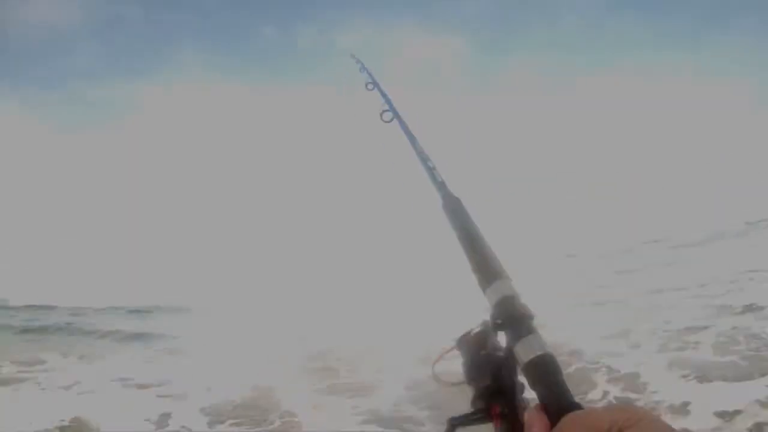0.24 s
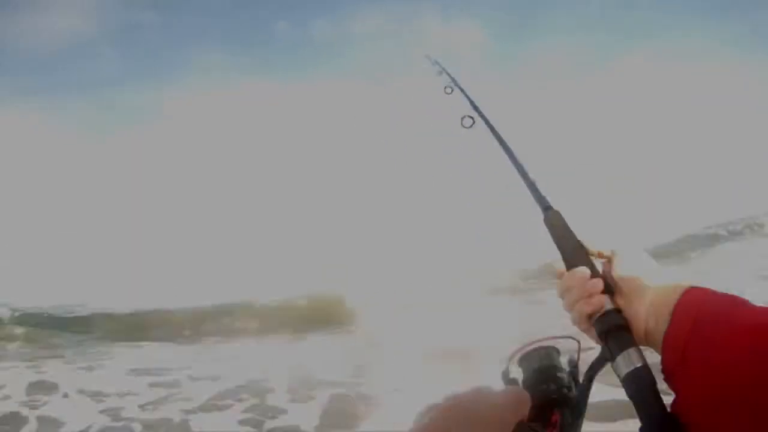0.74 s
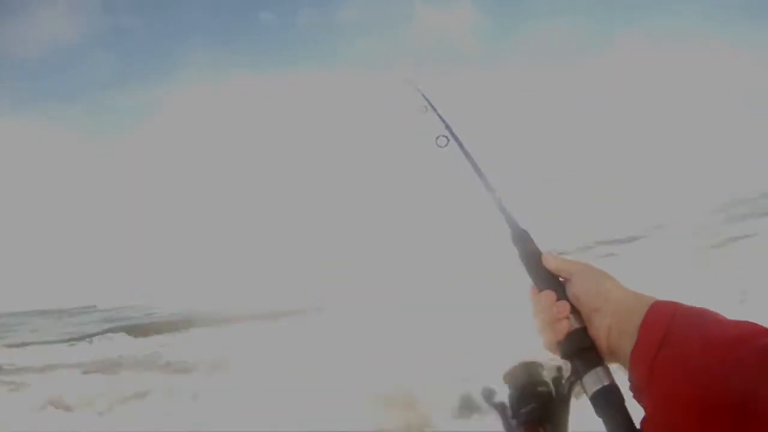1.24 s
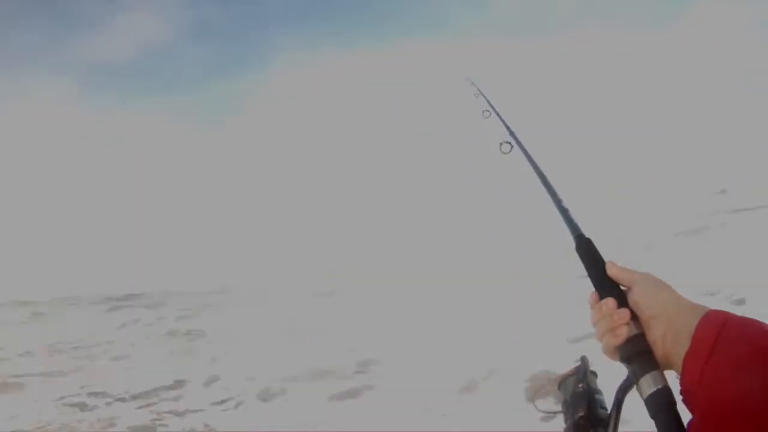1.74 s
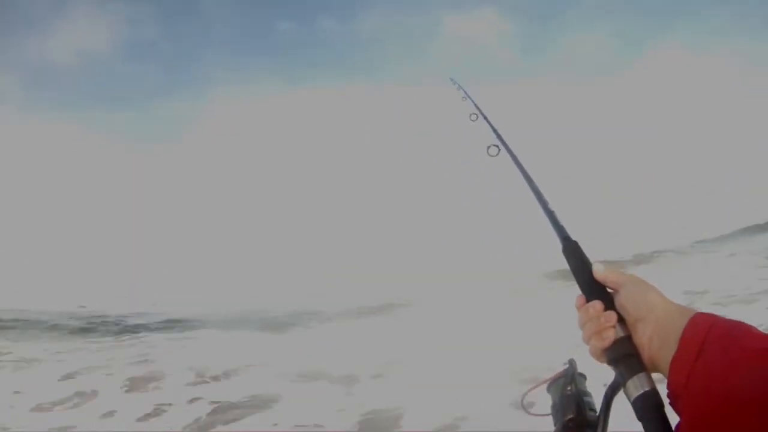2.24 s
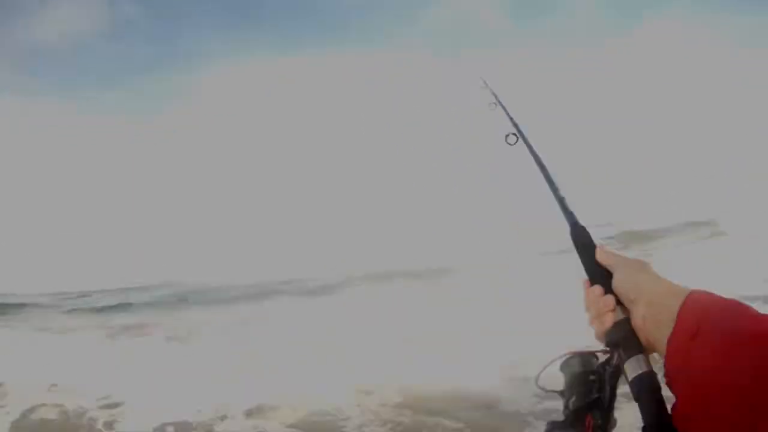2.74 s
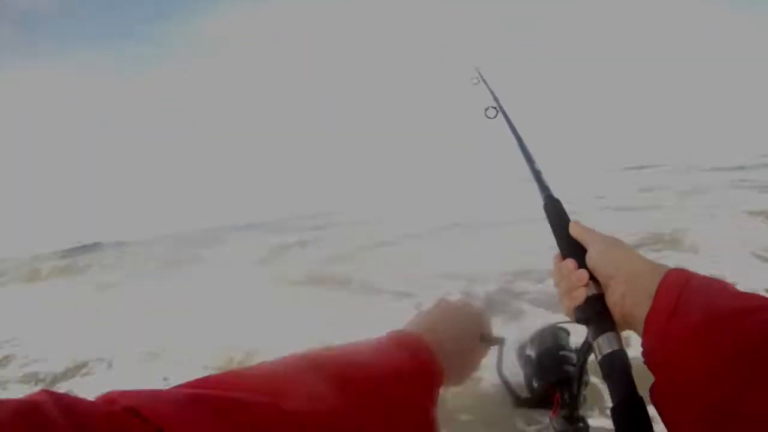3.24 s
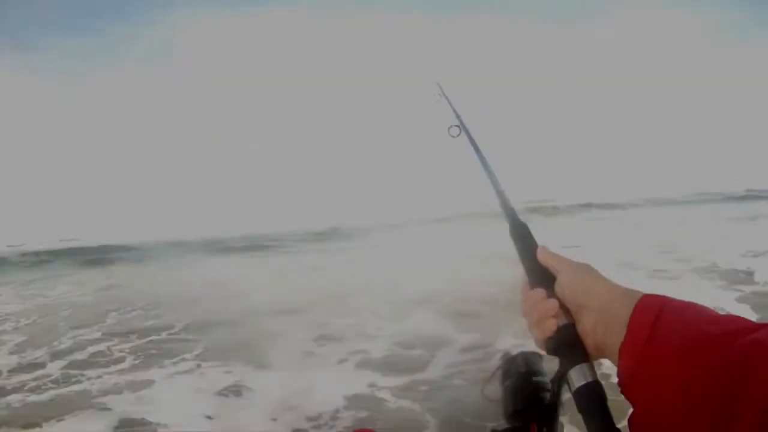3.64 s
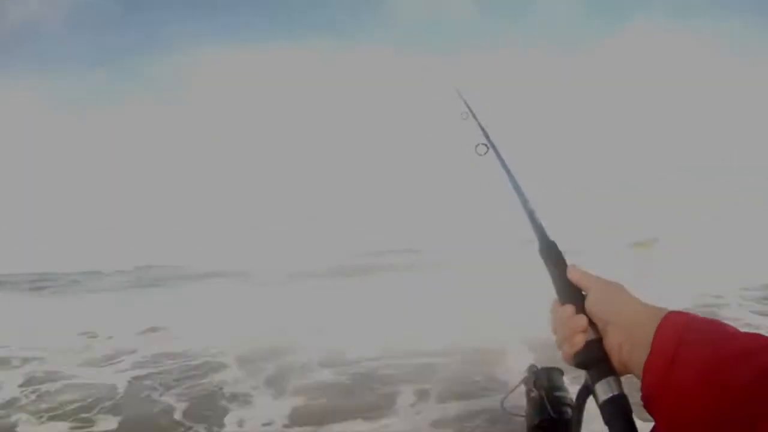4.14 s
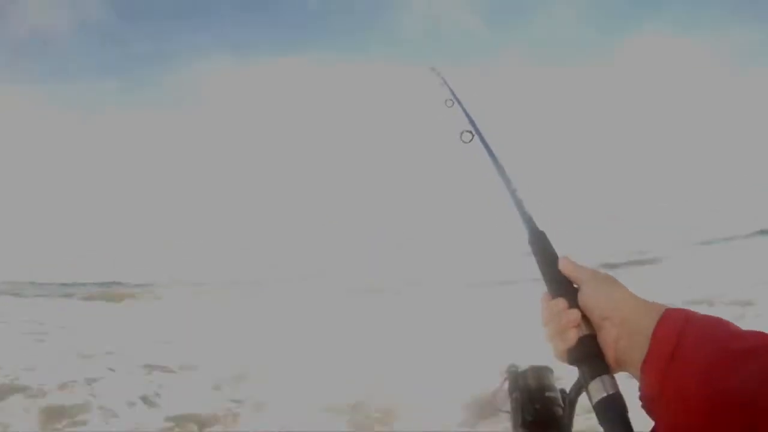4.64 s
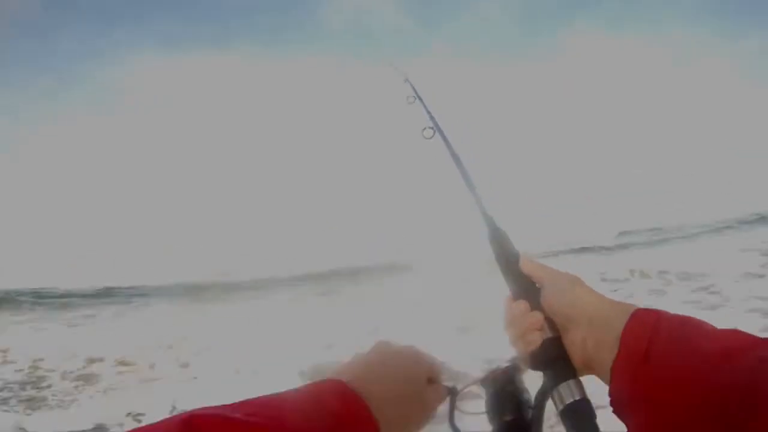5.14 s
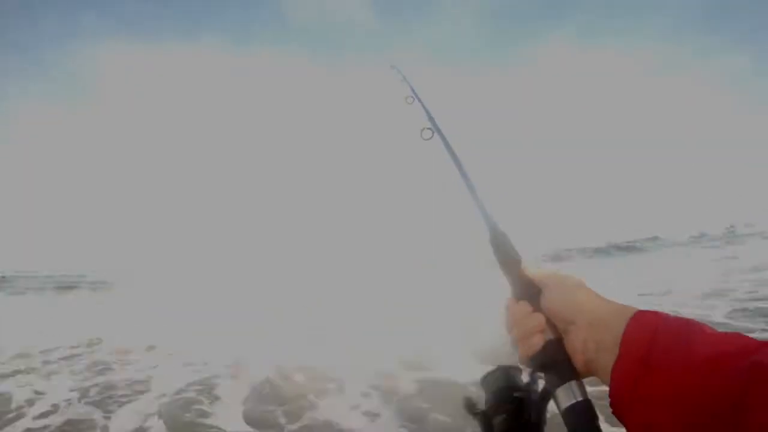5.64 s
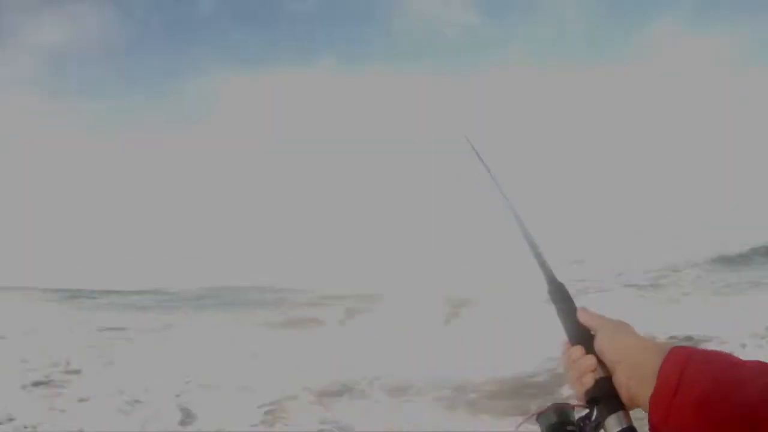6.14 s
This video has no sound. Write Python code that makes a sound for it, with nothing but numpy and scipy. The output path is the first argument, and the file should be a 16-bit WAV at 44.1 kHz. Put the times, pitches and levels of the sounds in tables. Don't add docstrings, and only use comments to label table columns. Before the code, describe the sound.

An angler stands and wades in shallow beach surf. Foamy, crackling sloshes surge at the start, again around one second, fall to a quiet lull, then return near three, four and six seconds. Fine spray fizzes after them, a few bubbles plop brightly, and the rod clicks. Distant surf hisses steadily. The microphone sits in a sealed waterproof case, so everything is thin, midrange and almost without bass.

```python
import sys
import numpy as np
from scipy import signal
from scipy.fft import rfft, irfft, next_fast_len
from scipy.io import wavfile
from scipy.ndimage import uniform_filter1d

SR = 44100
rng = np.random.default_rng(int(sys.argv[2]) if len(sys.argv) > 2 else 0)


def pcm_store(signal):
    levels = np.round(np.clip(np.atleast_2d(signal), -1, 1) * 32767)
    wavfile.write(sys.argv[1], SR, levels.astype(np.int16).T)


def ratio_of_db(decibels):
    return 10 ** (np.asarray(decibels, float) / 20)


N = 281341


def evened(x):
    return x / np.sqrt(np.mean(x ** 2) + 1e-20)


def read(points, hz):
    f, value = np.transpose(points)
    return np.interp(np.log(hz + 1), np.log(f + 1), value)


def add(mix, s, sound):
    part = mix[round(s * SR):][:len(sound)]
    part += sound[:len(part)]


def drift(lo_hz, hi_hz):
    t = np.arange(0, N + 64, 64) / SR
    rates_hz = np.geomspace(lo_hz, hi_hz, num=40)
    waves = sum(np.sin(2 * np.pi * (hz * t + rng.random())) for hz in rates_hz)
    return np.interp(np.arange(N) / SR, t, evened(waves))


def swells(s, length, roundness):
    t = np.arange(0, N + 64, 64) / SR
    return np.exp(-(abs(t - s[:, None]) / length[:, None]) ** roundness)


def summed_db(levels_db, shapes, rest_db):
    total_db = 10 * np.log10(ratio_of_db(2 * levels_db) @ shapes + ratio_of_db(2 * rest_db))
    return np.interp(np.arange(N), np.arange(len(total_db)) * 64, total_db)


def bubble(hz, cycles, glide):
    u = np.arange(max(8, int(cycles * SR / hz))) * hz / SR / cycles
    shape = np.sin(np.pi * u ** 0.73) ** 2
    return shape * np.sin(2 * np.pi * cycles * u * (1 + glide * (u - 1) / 2))


def through_case(x):
    # (frequency [Hz], level [dB])
    wall = [(100, -52), (200, -35.5), (500, -16.5), (1000, -8), (2000, -1), (3300, 2), (4800, 0),
            (6000, -6.5), (8500, -9.5), (12000, -15.5), (16500, -18.5)]
    # (centre [Hz], width [Hz], depth [0-1])
    port = (7045, 1730, 0.81)
    size = next_fast_len(N)
    hz = np.fft.rfftfreq(size, 1 / SR)
    centre_hz, width_hz, depth = port
    notch = 1 - np.clip(depth, 0, 1) / (1 + ((hz - centre_hz) / (width_hz / 2)) ** 2)
    return irfft(rfft(x, size) * ratio_of_db(read(wall, hz)) * notch, size)[:N]


def foam(lo_hz, hi_hz, cycles, per_s, spread_db):
    loudness = ratio_of_db(spread_db * np.minimum(rng.exponential(1, N), 5))
    bursts = loudness * (rng.random(N) < per_s / SR)
    kind = rng.integers(0, 12, N)
    out = np.zeros(N)
    for k, hz in enumerate(np.geomspace(lo_hz, hi_hz, num=12)):
        ring = bubble(hz, cycles, glide=0.096)
        ring = ring * np.sqrt(hz) / np.linalg.norm(ring)
        out += signal.oaconvolve(bursts * (kind == k), ring)[:N]
    return evened(through_case(out))


def stride():
    # (peak [s], half length [s], fizz [dB], gurgle above the fizz [dB],
    # power share of fine bubbles [dB])
    pushes = [(0.032, 0.087, -19.2, -14.5, -2.5), (.25, .086, -32, -15, -1), (.59, 0.19, -32.5, -34, 0.5),
              (0.95, 0.085, -20, -17, -1.5), (1.008, 0.046, -18, -13.5, -4),
              (1.089, 0.04, -19, -10.5, -3.5), (1.274, 0.11, -18, -16, -2), (1.47, .07, -39.5, -2.5, -9),
              (2.552, .12, -32.5, -15, -2), (2.796, 0.1, -18, -15, -2.5), (2.952, 0.09, -20.5, -20.5, -2),
              (3.16, 0.069, -29.3, -23, -1.5), (3.383, .086, -24, -19.5, -3.5),
              (4.048, 0.067, -25.8, -14, -3), (2.2, .17, -40, -20, -1), (4.222, 0.027, -18.5, -16, -1.5),
              (4.342, 0.16, -18.5, -15.5, -2.5), (4.675, 0.17, -21, -18.5, -1.74),
              (5.25, 0.37, -33.5, -13.5, -4), (5.55, 0.087, -23, -15, -3), (5.736, 0.066, -19, -12, -2.5),
              (5.86, 0.074, -17.5, -14, -3), (6.002, 0.086, -18, -15.5, -1.5),
              (6.135, .08, -27, -10.5, -5.5)]
    # (peak [s], half length [s], fizz [dB])
    crests = [(.771, 0.038, -28), (.9, .015, -26), (1.363, .02, -25), (2.672, .015, -23.5),
              (2.735, 0.019, -21.5), (3.027, 0.011, -27), (3.974, 0.024, -29), (4.144, .031, -23),
              (4.71, .03, -26), (5.46, 0.028, -29), (5.56, 0.01, -26), (5.678, 0.024, -19.5),
              (6.043, 0.023, -21)]
    crest_gurgle_db, crest_fine_db = -22, -1.3
    rest_db, rest_gurgle_db, rest_fine_db = -33, -12, -3

    slaps = [(*crest, crest_gurgle_db, crest_fine_db) for crest in crests]
    s, length, db, deep_db, fine_db = np.transpose(list(pushes) + slaps)
    shapes = swells(s, length, roundness=1.64)
    fizz_db = summed_db(db, shapes, rest_db)
    gurgle_db = summed_db(db + deep_db, shapes, rest_db + rest_gurgle_db) - fizz_db
    fine_share_db = summed_db(db + fine_db, shapes, rest_db + rest_fine_db) - fizz_db
    return fizz_db, gurgle_db, fine_share_db


def slosh(flutter_db):
    # (lowest [Hz], highest [Hz], ring [cycles], rate [bubbles/s], loudness spread [dB])
    families = [
        (1300, 3046, 5.16, 12000, 0.8),
        (3360, 6700, 6.2, 14000, 1.8),
        (134.4, 1175, 4.4, 5000, 1.5),
        (2500, 8600, 1.15, 410, -1),
    ]
    fizz_db, gurgle_db, fine_db = stride()
    coarse_db = 10 * np.log10(1 - np.clip(ratio_of_db(2 * fine_db), .1, .9))
    crackle_db = -13
    out = np.zeros(N)
    for family_db, family in zip([coarse_db, fine_db, gurgle_db, crackle_db], families):
        level_db = fizz_db + flutter_db + family_db + 0.46 * drift(6, 40)
        out += ratio_of_db(level_db) * foam(*family)
    return out


def spray(flutter_db):
    # (peak [s], half length [s], spray [dB], mist above the spray [dB])
    handfuls = [(.051, .048, -32.5, -3), (.15, .036, -39.5, -3), (.567, .048, -45, -2),
                (.668, .016, -44, -4), (.77, .071, -44.5, -2), (.918, 0.042, -39, 1),
                (.999, .032, -33.6, -3), (1.091, 0.039, -37.5, 1), (1.302, 0.087, -31, -2),
                (1.63, .029, -50, -1), (1.88, .04, -50, -3), (2.544, .017, -41, -5),
                (2.643, .016, -40.6, -8), (2.81, 0.16, -36.5, -0.5), (2.977, .062, -33.5, -3.5),
                (3.143, .074, -43.8, 1), (3.425, 0.12, -39, -1), (3.683, .051, -47, -2),
                (3.84, .09, -48.5, -14), (3.985, 0.027, -37.5, -6), (4.2, 0.098, -37, -2),
                (4.443, .248, -37.5, 0.5), (4.698, .063, -32.5, -3), (5.066, .15, -51.5, -2),
                (5.3, .047, -48, -1), (5.52, 0.096, -37.5, -4), (5.672, .025, -36.5, 0),
                (5.85, .123, -35.7, -1), (6.01, 0.073, -31, -3)]
    # (peak [s], half length [s], mist [dB])
    froth = [(.3, .4, -50), (1.8, .25, -48.5), (3.6, .07, -53), (5.07, .2, -48), (6.201, 0.45, -46)]
    # (lowest [Hz], highest [Hz], ring [cycles], rate [bubbles/s], loudness spread [dB])
    droplets = [
        (7080, 10800, 7.3, 14000, 1.2),
        (11000, 16100, 11, 18000, 1.5),
    ]
    froth_spray_db = -4
    calm_spray_db, calm_mist_db = -56.5, -68

    s, length, db, above_db = np.transpose(handfuls)
    froth_s, froth_length, froth_db = np.transpose(froth)
    shapes = swells(np.r_[s, froth_s], np.r_[length, froth_length], roundness=1.47)
    spray_db = summed_db(np.r_[db, froth_db + froth_spray_db], shapes, calm_spray_db)
    mist_db = summed_db(np.r_[db + above_db, froth_db], shapes, calm_mist_db)
    loose_db = flutter_db + 0.38 * drift(2.1, 24)
    falling = ratio_of_db(spray_db + loose_db) * foam(*droplets[0])
    mist = ratio_of_db(mist_db + loose_db + 0.4 * drift(6, 40)) * foam(*droplets[1])
    return falling + mist


def plops():
    # (time [s], peak level [dB], pitch [Hz], ring [cycles])
    large_bubbles = [(.988, -11, 2700, 7), (2.7175, -9, 4600, 9), (3.029, -11, 2900, 6),
                     (4.244, -9, 3700, 4), (5.5515, -12, 2800, 9), (5.5625, -14, 3700, 7),
                     (5.7072, -7, 3200, 4), (5.7101, -3.5, 3500, 3), (5.7235, -11, 4700, 6),
                     (5.983, -10, 4300, 6)]
    out = np.zeros(N)
    for s, db, hz, cycles in large_bubbles:
        add(out, s, ratio_of_db(db) * bubble(hz, cycles, glide=0.28))
    return through_case(out)


def handling():
    # (time [s], peak level [dB], ring [Hz], snap [dB], thud [dB])
    ticks = [(0.02, -32, 7250, -4, -15), (0.5447, -35, 7300, -13, -23), (0.5484, -32, 7300, -13, -23),
             (0.5806, -33, 7300, -10, -17), (0.669, -17, 7300, -9, -21), (1.659, -31, 7300, -14, -19),
             (1.909, -32, 7300, -15, -26), (2.5202, -36, 7300, -7, -22), (2.717, -29.5, 7300, -8, -20),
             (3.17, -31, 7300, -6, -12), (4.2096, -21.5, 7300, -16, -14), (5.665, -26, 7300, -9, -13),
             (5.7062, -24, 7300, -12, -19), (5.721, -23, 7300, -12, -16), (6.2016, -29, 7300, -11, -21),
             (6.214, -26, 7300, -16, -33), (6.228, -31, 7320, -11, -25)]
    # (time [s], length [s], level [dB], pitch [Hz], width [Hz])
    rubs = [
        (0.535, .025, -40, 7500, 2500),
        (1.6, .065, -39, 7000, 2200),
        (6.298, 0.041, -42, 7140, 1300),
    ]
    out = np.zeros(N)
    for s, db, hz, snap_db, thud_db in ticks:
        add(out, s, ratio_of_db(db) * bubble(hz, 6.3, glide=0.1))
        add(out, s, ratio_of_db(db + snap_db + 11) * bubble(13000, 2.2, glide=0.3))
        add(out, s, ratio_of_db(db + thud_db) * bubble(390, 2.4, glide=-0.1))
    for s, length, db, hz, width_hz in rubs:
        band = signal.butter(2, [hz - width_hz / 2, hz + width_hz / 2], "band", fs=SR)
        grip = ratio_of_db(2.7 * rng.standard_normal(100).repeat(40))
        scratch = rng.standard_normal(4000) * grip
        scratch = evened(signal.lfilter(*band, scratch))[:int(length * SR)]
        add(out, s, ratio_of_db(db) * scratch * np.hanning(len(scratch)) ** 0.5)
    return out


def sway():
    # (lowest [Hz], highest [Hz], ring [cycles], rate [lumps/s], loudness spread [dB])
    lumps = (32, 113, 3.2, 370, 1.4)
    fizz_db = stride()[0]
    return ratio_of_db(-65.5 + 0.71 * fizz_db + 3.0 * drift(2.9, 12)) * foam(*lumps)


def breakers():
    # (frequency [Hz], level per Hz [dB])
    surf = [(82, -71), (140, -45.5), (517, -19.5), (866, -12.5), (2950, -3.5), (4850, -7), (5910, -15.5),
            (7200, -26), (8950, -25.5), (15000, -35), (15900, -23)]
    frames, hz = N // 256 + 5, np.fft.rfftfreq(1024, 1 / SR)
    real, imaginary, patches = rng.standard_normal((frames, 513, 3)).T
    patches = uniform_filter1d(patches, size=12, axis=0)
    patches = evened(uniform_filter1d(patches, size=14, axis=1))
    spectrum = (real + 1j * imaginary) * ratio_of_db(read(surf, hz)[:, None] + 0.36 * patches)
    hiss = signal.istft(spectrum, nperseg=1024, noverlap=768)[1][:N]
    return ratio_of_db(-31) * evened(hiss)


def scene():
    flutter_db = 0.5 * drift(14, 120)
    water = slosh(flutter_db) + spray(flutter_db) + plops()
    mono = water + handling() + sway() + breakers()
    return np.tile(mono, (2, 1))


def widened(x):
    # (centre [s], lowest [Hz], highest [Hz])
    moments = [(.107, 4600, 6000), (.107, 13100, 14700), (1.918, 6900, 8500), (1.918, 13100, 14700),
               (2.174, 8300, 10600), (2.267, 5100, 6500), (2.267, 14500, 15700), (2.87, 8900, 11900),
               (3.52, 7500, 9200), (3.52, 13700, 15700), (6.028, 9600, 12700)]
    side = np.zeros(N)
    for s, lo_hz, hi_hz in moments:
        band = signal.firwin(255, [lo_hz, hi_hz], pass_zero=False, fs=SR)
        there = np.convolve(x[0, round(s * SR) - 512:][:1024], band, "same")
        noise = evened(np.convolve(rng.standard_normal(2048), band, "same"))
        noise = noise * signal.windows.tukey(2048, 0.9) ** 2
        add(side, s - 1024 / SR, ratio_of_db(-1.5) * there.std() * noise)
    return x + np.outer([1, -1], side)


def band_limit(x):
    return signal.sosfilt(signal.butter(12, 16050, fs=SR, output="sos"), x)


def record(dry):
    lowpass = signal.firwin(1023, 15740, window=("kaiser", 9), fs=SR)
    limited = signal.oaconvolve(dry, lowpass[None], "same")
    return band_limit(widened(limited))


dry = scene()
out = record(dry)
pcm_store(out)
```